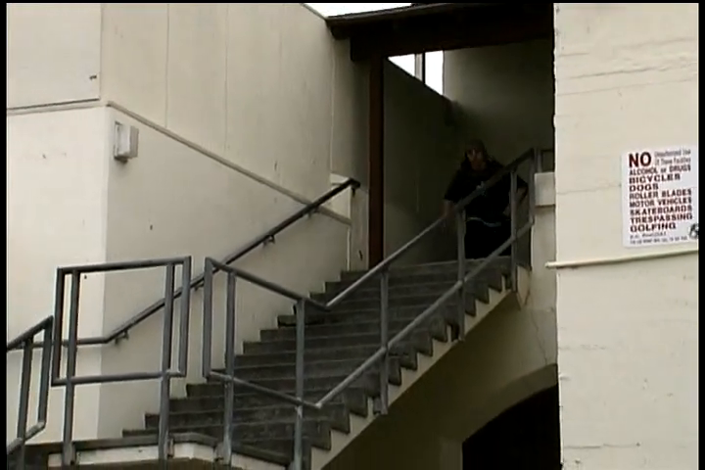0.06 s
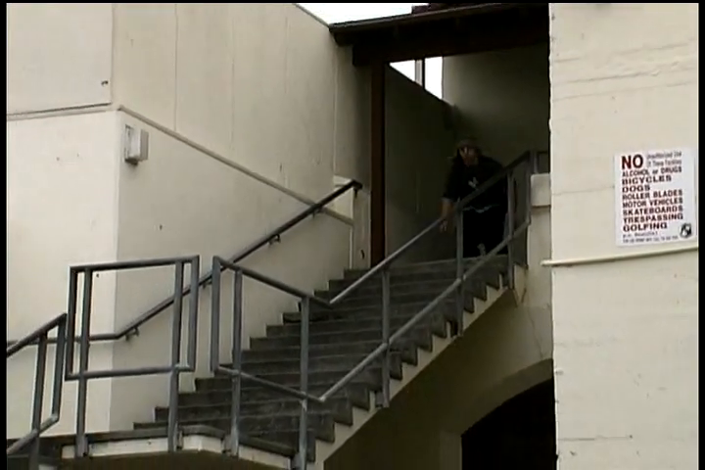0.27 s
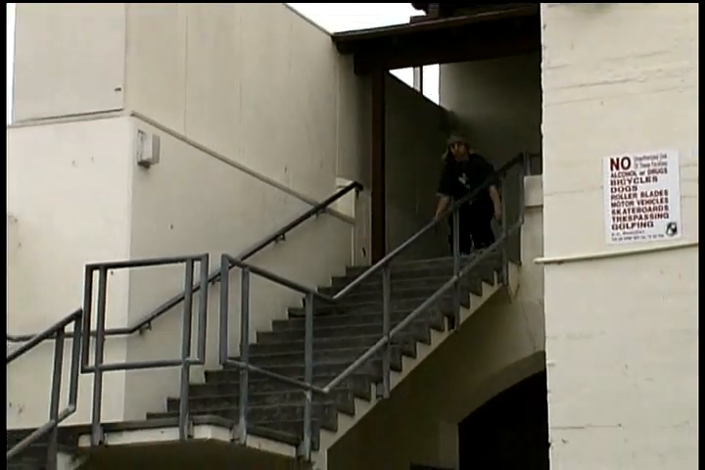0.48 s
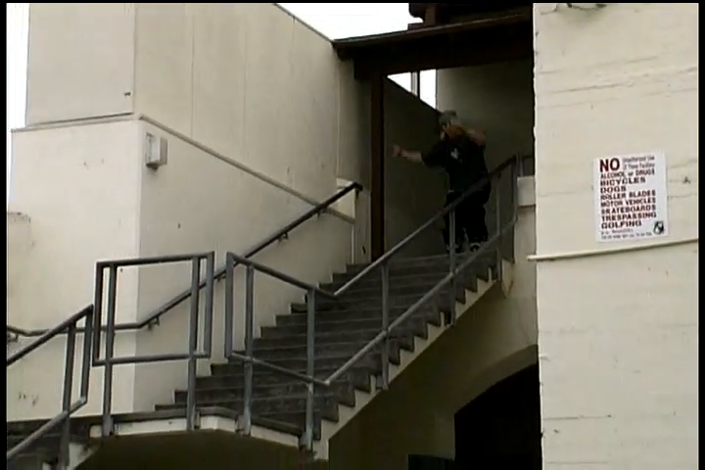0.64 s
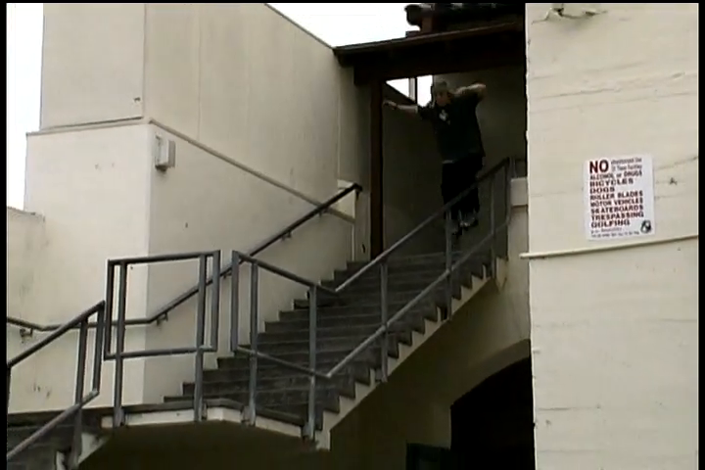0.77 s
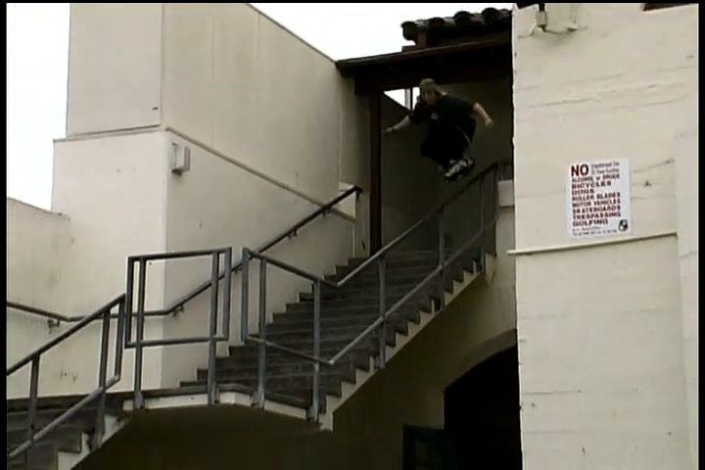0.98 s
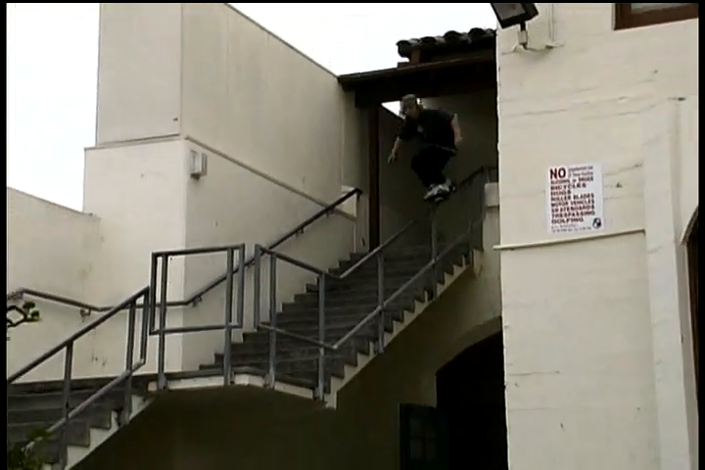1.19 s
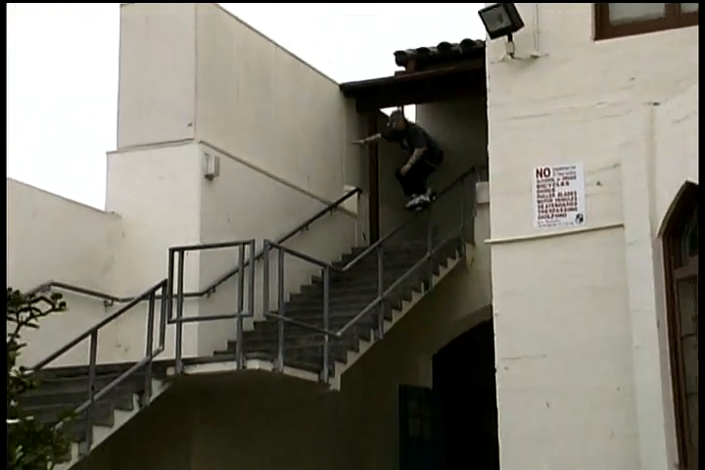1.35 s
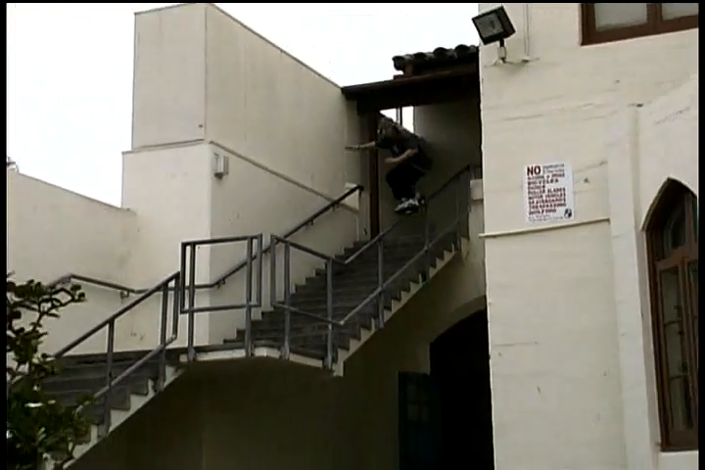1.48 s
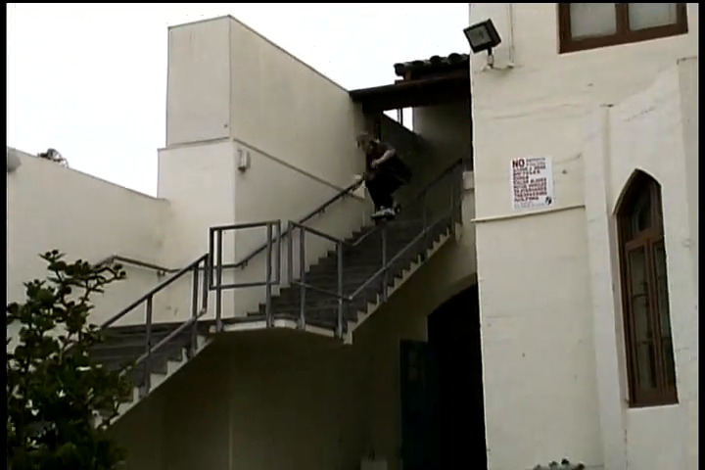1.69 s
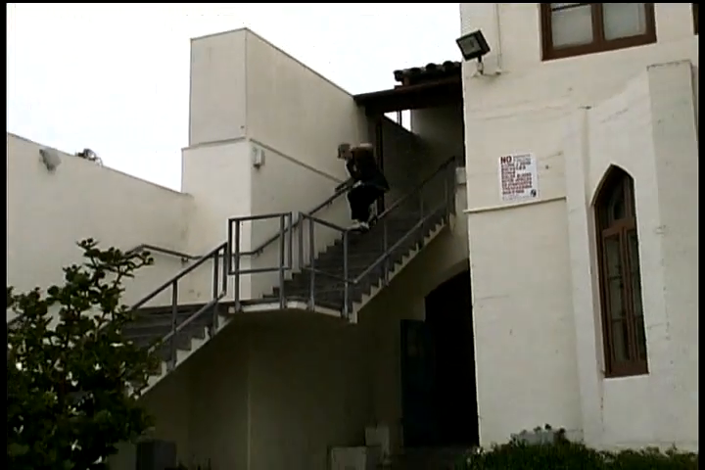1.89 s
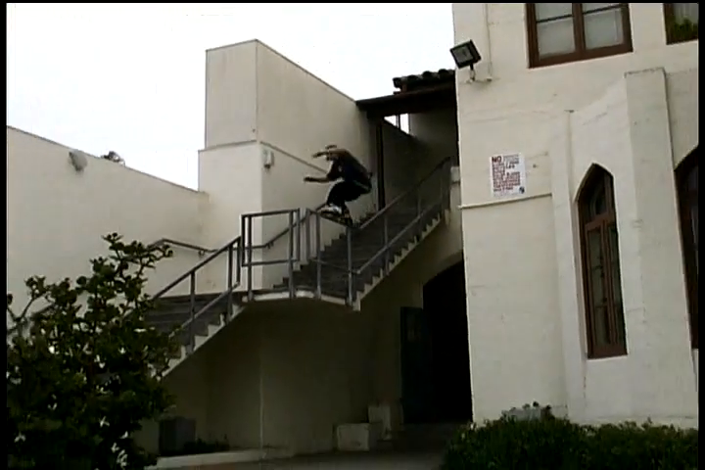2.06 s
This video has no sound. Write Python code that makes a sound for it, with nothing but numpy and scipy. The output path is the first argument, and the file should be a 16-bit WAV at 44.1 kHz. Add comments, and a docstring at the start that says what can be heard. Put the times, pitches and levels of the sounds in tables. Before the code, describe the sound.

Inline skates grind a steel handrail outdoors. At first wheels hiss and rumble faintly on concrete, with distant buzzy chirps around 0.3-0.6 s, then tiny take-off clicks near 0.8-0.9 s. At 1.07 s soles clatter on the rail with a dull thud and brief squeal. A thinner scrape continues, building until sharper slams at 1.9-2.0 s bring a loud, bright, ringing grind, still going at the end, with short wall echoes.

```python
"""Inline skater grinding a handrail

An inline skater rolls up to an outdoor staircase, jumps and lands on its steel handrail.
Plastic soles clatter (noise bursts), grind nearer (resonant friction), then slam and scrape harder.
The tube rings in decaying sine modes; stucco walls add discrete echoes and a diffuse tail.
A few far birds chirp as gliding, warbling tones over coloured air noise and a low hum."""
import sys
import numpy as np
from scipy import signal
from scipy.fft import rfft, irfft, next_fast_len
from scipy.io import wavfile
from scipy.ndimage import map_coordinates

SR = 44100
rng = np.random.default_rng(int(sys.argv[2]) if len(sys.argv) > 2 else 0)


def store_pcm(level_fs):
    """Save levels as 16-bit WAV."""
    pcm = np.round(np.clip(level_fs, -1, 1) * 32767).astype(np.int16)
    wavfile.write(sys.argv[1], SR, np.atleast_2d(pcm).T)


N = 93977
T = np.arange(N) / SR

# soles slap and scuff the rail: start_s, level_db, decay_s, tilt_db_per_octave, struck_spot_hz
SOLE_KNOCKS = [(1.0654, -16, .006, 3, 2280), (1.0771, -20, 0.011, -2, 2800),
               (1.108, -17.5, .009, 2.5, 3560), (1.123, -19.5, 0.0082, -.5, 3620),
               (1.9097, -10.5, 0.0035, -1, 4550), (1.9164, -11, 0.0043, 0, 1660),
               (1.9237, -15.5, 0.0057, -3.5, 1390), (1.935, -19, 0.0081, -1, 1390),
               (1.976, -15, 0.015, -1, 4230), (1.9855, -15.5, .007, -1, 4230),
               (2.012, -17, 0.013, 0.5, 5350), (2.0209, -14.5, 0.0088, 0, 2500)]


def from_db(db):
    """Amplitude gain is ten to the power of decibels over twenty."""
    return 10 ** (np.asarray(db) / 20)


def rms_one(x):
    """Normalisation: dividing by the root mean square gives unit power."""
    return x / np.sqrt(np.mean(x ** 2) + 1e-20)


def in_time(rows):
    """Linear interpolation over time of each column after the first."""
    time_s, *columns = np.transpose(rows)
    return [np.interp(T, time_s, column) for column in columns]


def colour(x, points, tilt_db=0):
    """Minimum-phase filter: folding the cepstrum makes the (Hz, dB) response causal."""
    size = 2 * next_fast_len(len(x))
    octaves = np.log2(np.maximum(np.fft.rfftfreq(size, 1 / SR), 10))
    hz, db = np.transpose(points)
    curve_db = np.interp(octaves, np.log2(hz), db)
    # tilt in dB per octave about 3 kHz, held beyond two octaves
    curve_db = curve_db + tilt_db * np.clip(octaves - np.log2(3000), -2, 2)
    cepstrum = irfft(np.log(from_db(curve_db)))
    cepstrum[1:size // 2] *= 2
    cepstrum[size // 2 + 1:] = 0
    response = np.exp(rfft(cepstrum))
    return irfft(rfft(x, size) * response)[:len(x)]


def noise(points):
    """Spectral shaping turns white noise into coloured noise of unit power."""
    return rms_one(colour(rng.standard_normal(N), points))


def drift(rate_hz):
    """Low-pass noise: two equal poles smooth white noise into a random curve of spread 1."""
    r = np.exp(-2 * np.pi * rate_hz / SR)
    smooth = signal.lfilter([1], [1, -2 * r, r * r], rng.standard_normal(2 * N))
    return rms_one(smooth[N:])  # the first half lets the filter settle


def resonate(x, hz, width_hz):
    """Damped resonance: a pole pair passes a band of the given width with gain about 1 on top."""
    r = np.exp(-np.pi * width_hz / SR)
    zeros = np.array([1, 0, -1]) * (1 - r * r) / 2
    poles = [1, -2 * r * np.cos(2 * np.pi * hz / SR), r * r]
    return signal.lfilter(zeros, poles, x)


def fade(start_s, decay_s):
    """Linear damping: a sudden start followed by exponential decay."""
    return (T >= start_s) * np.exp(-np.maximum(T - start_s, 0) / decay_s)


def yard(x, t60):
    """Diffuse reverberation: convolution with decaying noise, evened in colour, of unit energy."""
    tail = rng.standard_normal(N) * from_db(-60 * T / t60)
    for _ in range(3):
        spectrum = rfft(tail)
        flat = irfft(spectrum / np.abs(spectrum), N)
        tail = flat * (T < t60 / 2)
    return signal.fftconvolve(x, tail / np.linalg.norm(tail))[:N]


def friction():
    """Sliding contact: sparse tiny snags of random sign over smooth rubbing, judder in level."""
    snags_per_s, snag_db, judder_db, judder_hz = 4200, -5.5, 1, 54.25
    happens = rng.random(N) < snags_per_s / SR
    snags = rms_one(rng.choice([-1, 1], N) * happens)
    rubbing = rng.standard_normal(N)
    return (from_db(snag_db) * snags + rubbing) * from_db(judder_db * drift(judder_hz))


def narrow_rub(hz, width_hz):
    """Resonant selection: two equal resonances in series pass a steep band of friction."""
    once = resonate(friction(), hz, width_hz)
    return rms_one(resonate(once, hz, width_hz))


def wander(x):
    """Frequency modulation by a moving read point: the pitch slides as the sole rocks on the tube."""
    speed_spread, rate_hz = .007, 5
    shift = np.cumsum(speed_spread * drift(rate_hz))  # samples
    return map_coordinates(x, [np.arange(N) + shift], order=3, mode="mirror")


def sole_scrape():
    """Source and filter: friction excites sole and tube resonances that waver with the contact point."""
    # sliding on the rail as the skater nears: time_s, level_db, tilt_db_per_octave
    sliding = [(1.052, -52, 2), (1.064, -29.5, 0.5), (1.07, -24, 1), (1.115, -23.5, -0.5), (1.15, -27, 0),
               (1.195, -34, -1), (1.34, -31.5, 1.5), (1.43, -33.5, 1.2), (1.53, -31.5, 8),
               (1.59, -32.5, 1.5), (1.71, -30, 3), (1.8, -27.5, 3), (1.9, -25.5, 3), (1.93, -19.5, 1.5),
               (2.02, -20, 1.3), (2.06, -21.5, 1), (2.13, -21, 3)]
    # resonances added to the plain rub: pitch_hz, width_hz, level_db
    sole_resonances = [(2910, 68, -11), (3550, 150, 0), (4890, 84, -1.5), (5503, 90, 1), (7590, 94, 0.5)]
    # overall colour of the soles: frequency_hz, level_db
    sole_colour = [(100, -12), (280, -15.5), (430, -19.5), (570, -25), (700, -11), (1050, -8), (1500, -4),
                   (2060, -5), (2800, -1.5), (4300, -2.5), (5600, -2), (7200, -7.5), (8200, -13.5),
                   (9800, -16), (11300, -27.5)]
    waver_db = 3
    level_db, tilt_db = in_time(sliding)
    rub = friction()
    body = rub.copy()
    for hz, width_hz, db in sole_resonances:
        gain = from_db(db + waver_db * np.tanh(drift(3)))
        body += gain * wander(resonate(rub, hz, width_hz))
    # a moving blend of two fixed tilts changes the brightness in time
    dull = rms_one(colour(body, sole_colour, -2))
    bright = rms_one(colour(body, sole_colour, 2))
    share = np.interp(tilt_db, [-2, 2], [0, 1])
    blend = (1 - share) * dull + share * bright
    return from_db(level_db) * blend * (T > sliding[0][0])


def boot_hum():
    """Cavity resonance: the hollow boot hums from the first knock on."""
    # hollow boot: pitch_hz, width_hz, level_db
    boot_resonances = [(1552, 210, -47), (1767, 140, -45.5)]
    hum = sum(from_db(db) * narrow_rub(hz, width_hz) for hz, width_hz, db in boot_resonances)
    return hum * (T > SOLE_KNOCKS[0][0])


def squeal():
    """Narrow-band friction: a sole squeals under the hardest pressure, around the landings."""
    # strength of the squeal: time_s, level_db
    squeal_level = [(1.095, -42), (1.115, -27.5), (1.18, -35), (1.21, -60), (1.89, -38), (1.95, -33),
                    (2.13, -27.5)]
    pitch_hz, width_hz = 5050, 380
    level_db = in_time(squeal_level)[0]
    return narrow_rub(pitch_hz, width_hz) * from_db(level_db) * (T > squeal_level[0][0])


def grind():
    """Superposition of the three sounds driven by sliding: scrape, boot hum and squeal."""
    return sole_scrape() + boot_hum() + squeal()


def knocks():
    """Impact excitation: a crack and brief crunch, coloured by the resonance of the struck spot."""
    # colour of a slap: frequency_hz, level_db
    knock_colour = [(120, -6), (350, -15.5), (570, -18), (760, -2.5), (1100, -0.5), (1500, -1), (2050, -1),
                    (2500, 4), (3200, -5.5), (4900, 2.5), (6000, 1), (8500, -1.5), (11300, -14)]
    crack_share, spot_width_hz, spot_db = 0.35, 340, 10.5
    out = np.zeros(N)
    for start_s, db, decay_s, tilt_db, spot_hz in SOLE_KNOCKS:
        envelope = fade(start_s, decay_s)
        strength = np.linalg.norm(envelope)
        burst = rng.standard_normal(N) * envelope
        burst[int(start_s * SR)] += crack_share * strength
        spot = from_db(spot_db) * resonate(burst, spot_hz, spot_width_hz)
        slap = colour(burst + spot, knock_colour, tilt_db)
        out += from_db(db) * strength * slap / np.linalg.norm(slap)
    return out


def rail():
    """Modal vibration: landings bend the tube into a thud; chattering contact rings its high modes."""
    # weight comes down on the rail: start_s, thud_db, ring_db
    landings = [(1.068, -42, -41), (1.104, -32.5, -30), (1.913, -30, -21), (2.012, -38.5, -26)]
    # modes of the steel tube: pitch_hz, level_db, t60_s
    rail_modes = [(93, -10, 1), (137.6, 9, 0.22), (176.5, 2, 0.22), (249.1, -11, 1.36), (349.4, -15.5, 0.6),
                  (4890, 2, 0.25), (5320, 0, 0.35)]
    thud_top_hz, thud_rise_s, chatter_s = 600, 0.014, 0.015
    out = np.zeros(N)
    for start_s, thud_db, ring_db in landings:
        for hz, db, t60 in rail_modes:
            level_db, rise_s = (thud_db, thud_rise_s) if hz < thud_top_hz else (ring_db, chatter_s)
            swing = np.sin(2 * np.pi * (hz * T + rng.random()))
            # two decays subtracted give a soft onset
            envelope = fade(start_s, t60 / np.log(1000)) - fade(start_s, rise_s)
            out += from_db(level_db + db) * swing * envelope
    return out


def wheels():
    """Rolling contact: friction makes the wheels hiss, low noise rumbles, and the skates click off."""
    # wheels on the landing: time_s, hiss_db, rumble_db
    rolling = [(0, -61, -47.5), (.16, -53.5, -48.5), (.185, -46, -43), (.26, -51.5, -49.5),
               (.37, -45.5, -46), (.46, -46, -43.5), (.53, -50, -66), (.61, -48.5, -63), (.66, -55, -65),
               (.76, -58, -56.5), (.95, -62, -81)]
    # hiss on the concrete: frequency_hz, level_db
    hiss_colour = [(300, -3.5), (550, -7.5), (800, -0.5), (1400, 0), (2600, -3.5), (5000, -1.5), (7600, -4),
                   (9500, -9), (11300, -18)]
    # rumble of the landing: frequency_hz, level_db
    rumble_colour = [(45, -20), (75, 4.5), (115, -5), (215, 2.5), (320, -13), (500, -20), (1200, -59)]
    # skates click at take-off: start_s, level_db
    take_off_clicks = [(0.767, -57), (0.896, -57.5)]
    click_hz, click_width_hz, click_decay_s = 7000, 3400, 0.017
    hiss_db, rumble_db = in_time(rolling)
    hiss = from_db(hiss_db) * rms_one(colour(friction(), hiss_colour))
    rumble = from_db(rumble_db) * noise(rumble_colour)
    click_envelope = sum(from_db(db) * fade(s, click_decay_s) for s, db in take_off_clicks)
    clicks = rms_one(resonate(friction(), click_hz, click_width_hz)) * click_envelope
    return hiss + rumble + clicks


def birds():
    """Frequency modulation: random warble makes gliding chirps buzzy; wall echoes blur them."""
    # far birds: start_s, length_s, middle_pitch_hz, glide_hz, level_db
    chirps = [(.008, 0.041, 3950, 600, -49), (0.263, 0.058, 4526, 100, -38.5),
              (0.313, 0.055, 4620, -200, -42.5), (0.321, 0.075, 3364, -250, -40.5),
              (0.42, 0.053, 4490, -100, -45.5), (0.574, 0.032, 2920, -100, -49),
              (0.82, 0.15, 5670, 50, -61)]
    warble_hz, warble_rate_hz, echo_t60_s, direct_db = 202, 320, 0.54, -1.5
    out = np.zeros(N)
    for start_s, length_s, pitch_hz, glide_hz, db in chirps:
        along = np.clip((T - start_s) / length_s, 0, 1)
        hz = pitch_hz + glide_hz * (along - .5) + warble_hz * drift(warble_rate_hz)
        envelope = np.sqrt(np.abs(np.sin(np.pi * along)))
        out += from_db(db) * envelope * np.sin(2 * np.pi * np.cumsum(hz) / SR)
    direct = from_db(direct_db)
    return (direct * out + yard(out, echo_t60_s)) / np.hypot(direct, 1)


def background(waver_db=3):
    """Broadband and tonal ambience: coloured air noise and low sines wavering within a few dB."""
    # outdoor air: frequency_hz, level_db
    air_colour = [(42, 4), (70, -15), (105, 3.5), (225, -0.5), (330, -6.5), (530, -16.5), (850, -14),
                  (1500, -10.5), (3000, -16), (5400, -17.5), (6300, -38), (11000, -40)]
    # low hum: pitch_hz, level_db
    hum_tones = [(75.4, -57), (228, -62)]
    air_db = -51
    out = from_db(air_db) * noise(air_colour)
    for hz, db in hum_tones:
        gain = from_db(db + waver_db * np.tanh(drift(0.59)))
        out += gain * np.sqrt(2) * np.sin(2 * np.pi * hz * T)
    return out


def scene():
    """Superposition and stereo: nearly mono, wider in the treble, drifting slightly right."""
    # reflections from the walls: delay_s, level_db
    wall_echoes = [(.011, -13.5), (.037, -10)]
    # diffuse sound that differs between the channels: frequency_hz, level_db
    side_colour = [(1300, -61.5), (3000, -32.5), (5000, -19), (9000, -18.5)]
    yard_t60_s, yard_db, blur_t60_s = 0.81, -8, 0.019
    left_lag_s, pan_db_per_s = .000002, .25
    skate = grind() + knocks()
    echoes = sum(from_db(db) * np.interp(T - delay, T, skate, left=0) for delay, db in wall_echoes)
    reverberation = from_db(yard_db) * yard(skate, yard_t60_s)
    mid = skate + echoes + reverberation + rail() + wheels() + birds() + background()
    side = colour(yard(mid, blur_t60_s), side_colour)
    # a phase proportional to frequency is a pure delay
    lag_phase = np.exp(-2j * np.pi * np.fft.rfftfreq(N, 1 / SR) * left_lag_s)
    late = irfft(rfft(mid) * lag_phase, N)
    pan = from_db(pan_db_per_s * T / 2)
    return np.array([(late + side) / pan, (mid - side) * pan])


def record(dry):
    """Band limiting: the microphone drops the deep bass; the top is cut steeply."""
    bass_cut_hz, top_cut_hz = 59, 11250
    high_pass = signal.butter(4, bass_cut_hz, "high", fs=SR, output="sos")
    low_pass = signal.ellip(12, .2, 80, top_cut_hz, fs=SR, output="sos")
    return signal.sosfilt(low_pass, signal.sosfilt(high_pass, dry))


dry = scene()
out = record(dry)
store_pcm(out)
```